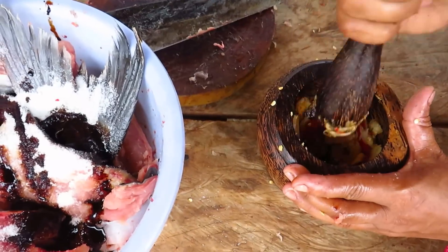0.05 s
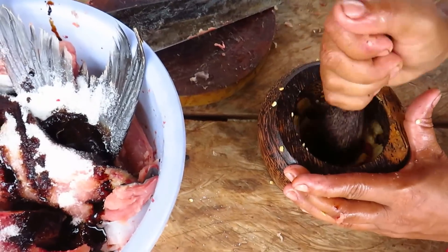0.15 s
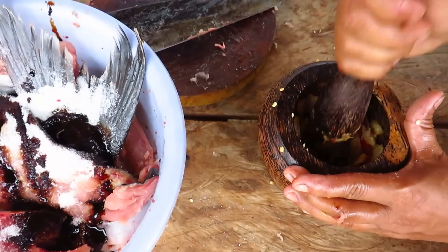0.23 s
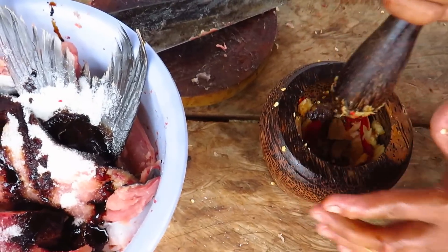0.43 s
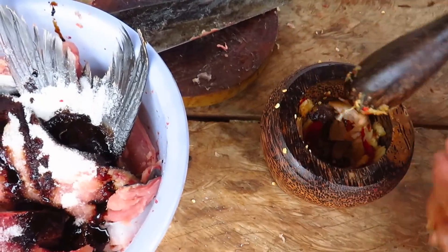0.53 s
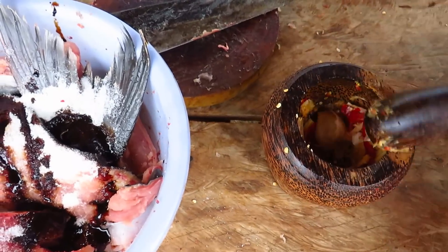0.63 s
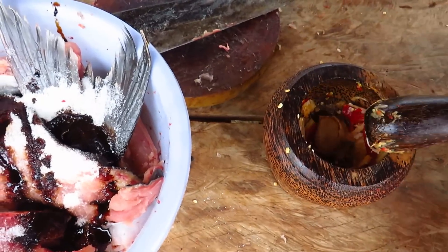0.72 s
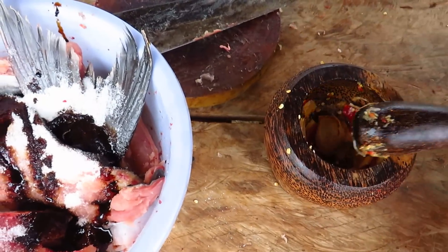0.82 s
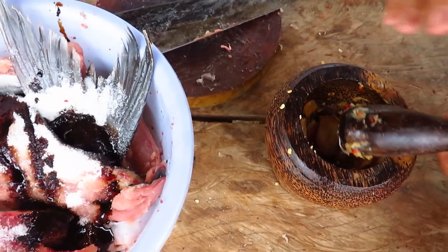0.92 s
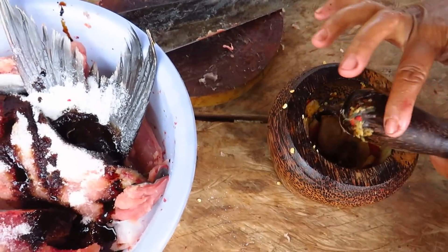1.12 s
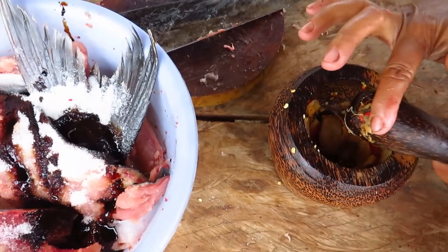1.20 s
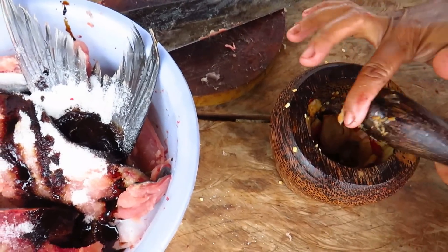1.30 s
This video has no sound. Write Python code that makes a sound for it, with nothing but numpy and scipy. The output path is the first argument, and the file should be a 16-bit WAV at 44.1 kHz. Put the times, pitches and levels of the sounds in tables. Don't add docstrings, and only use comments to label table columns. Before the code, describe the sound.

A wooden pestle pounds a small wooden mortar on planks: a dying thud, one very loud hard knock, then a lighter rim tap, with slight dish rattle and wind buffeting the close stereo microphones outdoors.

```python
import sys
import numpy as np
from scipy import signal
from scipy.io import wavfile

SR = 44100
rng = np.random.default_rng(int(sys.argv[2]) if len(sys.argv) > 2 else 0)


def persist_wave(psi):
    counts = np.round(np.clip(psi, -1, 1) * 32767).astype(np.int16)
    wavfile.write(sys.argv[1], SR, np.atleast_2d(counts).T)


def natural_amplitude(level_db):
    exponent = np.asarray(level_db, float) / 20
    return 10 ** exponent


N = 59535
LEAD_S = 0.05
LONG_N = N + int(LEAD_S * SR)

# start_s, level_db, contact_cutoff_hz, planks_relative_db, second_touch_relative_db
BLOWS = [
    (-.03, -18.5, 703.6, 4.5, 0.5),
    (0.2474, -8.5, 2594, 4.5, 4),
]
# start_s, level_db, contact_cutoff_hz, planks_relative_db
TAPS = [
    (0.7762, -41, 4070, -9.5),
    (0.779, -22, 2542, 3),
    (1.244, -48, 900, 11),
]
# time_s, level_db
BREEZE = [(0.0, -49), (0.13, -51), (0.206, -50), (0.348, -47), (0.6, -60.5), (0.816, -50.5), (0.966, -48),
          (1.35, -49.5)]


def rms_one(x):
    return x / np.sqrt(np.mean(x ** 2) + 1e-20)


def at_hz(points, hz):
    table_hz, value = np.transpose(points)
    return np.interp(np.log(hz), np.log(table_hz), value)


def drift(rate_hz):
    r = np.exp(-80 * np.pi * rate_hz / SR)
    white = rng.standard_normal(N // 40 + 2002)
    slow = rms_one(signal.lfilter([1], [1, -2 * r, r * r], white)[2000:])
    return np.interp(np.arange(N) / 40, np.arange(len(slow)), slow)


def soft(x, hz):
    r = np.exp(-2 * np.pi * hz / SR)
    return signal.lfilter([(1 - r) ** 2], [1, -2 * r, r * r], x + 1e-18)


def butter(x, hz, kind):
    return signal.sosfilt(signal.butter(2, hz, kind, fs=SR, output="sos"), x)


def click(start_s, level_db):
    x = np.zeros(LONG_N)
    x[int((start_s + LEAD_S) * SR)] = natural_amplitude(level_db)
    return x


def dying(start_s, t60_s):
    t = np.arange(LONG_N) / SR - LEAD_S - start_s
    return (t >= 0) * natural_amplitude(-60 * np.maximum(t, 0) / t60_s)


def body(force, modes):
    out = 0
    for hz, level_db, t60_s in modes:
        r = natural_amplitude(-60 / (t60_s * SR))
        w = 2 * np.pi * hz / SR
        ring = signal.lfilter([0, np.sin(w)], [1, -2 * r * np.cos(w), r * r], force + 1e-18)
        out = out + natural_amplitude(level_db) * ring
    return out


def banded_noise(spectrum, low_hz, count, patchy_db, rate_hz):
    # frequency_hz, likeness_0_to_1
    likeness = [(40, 1), (100, 0.39), (200, 0.88), (500, 0.88), (1000, 0.76), (2000, 0.26), (5000, 0.53),
                (12000, 0.11)]
    out, together = 0, drift(rate_hz)
    edges_hz = low_hz * 2 ** (np.arange(count + 1) / 2)
    white = rng.standard_normal((2, 2, N + 4000))
    for k, (low, high) in enumerate(zip(edges_hz, edges_hz[1:])):
        mid, side = butter(white[k % 2], [low, high], "band")[:, -N:]
        hz = np.sqrt(low * high)
        alike = np.clip(at_hz(likeness, hz), 0, 1)
        flicker_db = patchy_db * (together + 0.22 * drift(rate_hz))
        stereo = np.sqrt(1 + alike) * mid + np.sqrt(1 - alike) * side * [[1], [-1]]
        out = out + natural_amplitude(at_hz(spectrum, hz) + flicker_db) * stereo
    return rms_one(out)


def breeze_level_db():
    return np.interp(np.arange(N) / SR, *np.transpose(BREEZE))


def distant_hiss():
    # frequency_hz, level_db_per_hz
    hiss_spectrum = [(300, -5.5), (500, -9), (1000, -13), (2000, -20), (4000, -25.5), (8000, -34.5),
                     (12000, -47.5), (16000, -57.5)]
    breeze_db = breeze_level_db()
    level_db = -62 + 0.11 * (breeze_db - breeze_db.mean())
    return natural_amplitude(level_db) * banded_noise(hiss_spectrum, 300, count=12, patchy_db=0.88, rate_hz=20)


def wind():
    # frequency_hz, level_db_per_hz
    wind_spectrum = [(20, -20.5), (50, -2), (90, -9), (150, -6), (250, -17.5), (450, -36)]
    noise = banded_noise(wind_spectrum, 14, count=9, patchy_db=4.0, rate_hz=75)
    return natural_amplitude(breeze_level_db() + 7.5) * noise


def buffets():
    # start_s, level_db, swing_hz, left_minus_right_db
    gusts = [(0.126, -37.5, 80, 4), (0.187, -45, 62.2, 4), (0.398, -39, 60, 3), (0.557, -37.5, 85, 11),
             (0.621, -33, 77, 8), (0.689, -43, 58.5, 2), (0.517, -41, 46.3, 0), (0.892, -38, 89.94, 15.5),
             (0.914, -31, 74, -8), (0.982, -24.5, 90.9, -2), (1.016, -28.5, 68, -2.5),
             (1.047, -41.5, 59, 1), (1.08, -44, 81.5, 0.5), (1.164, -23.5, 56.1, -6), (1.3172, -30, 86, -8)]
    length_cycles = 1.38
    out, t = np.zeros((2, N)), np.arange(N) / SR
    for start_s, level_db, hz, pan_db in gusts:
        cycles = (t - start_s) * hz - 0.5
        swing = np.exp(-(2 * cycles / length_cycles) ** 2) * np.cos(2 * np.pi * cycles)
        out += natural_amplitude(level_db) * swing * natural_amplitude(pan_db * np.array([[0.5], [-0.5]]))
    return out


def yard_tail():
    # frequency_hz, level_db_per_hz
    yard_spectrum = [(150, -4.5), (300, 5), (700, 1), (1200, -19), (2500, -20.5), (5000, -32),
                     (9000, -50.5)]
    # frequency_hz, t60_s
    yard_t60 = [(200, .3), (700, .2), (2000, 0.11), (6000, 0.023)]
    yard_db, tap_db, rise_s, air_cut_hz = -18.5, -5, 0.018, 5400
    touches = [(s, db, hz, planks_db) for s, db, hz, planks_db, _ in BLOWS]
    touches += [(s, db + tap_db, hz, planks_db) for s, db, hz, planks_db in TAPS]
    noise = rng.standard_normal((2, LONG_N))
    tail, edges_hz = 0, 130 * 2 ** (np.arange(13) / 2)
    for low, high in zip(edges_hz, edges_hz[1:]):
        hz = np.sqrt(low * high)
        strength = 0
        for start_s, level_db, contact_hz, planks_db in touches:
            gain = natural_amplitude(level_db + 0.4 * planks_db) / (1 + (hz / contact_hz) ** 2)
            swell = dying(start_s, at_hz(yard_t60, hz)) - dying(start_s, rise_s)
            strength = strength + gain * swell
        band = butter(strength * noise, [low, high], "band")
        tail = tail + 10 * natural_amplitude(yard_db + at_hz(yard_spectrum, hz)) * band
    return butter(tail, air_cut_hz, "low")[:, -N:]


def table_thuds():
    # start_s, level_db
    thuds = [
        (-.0035, -23),
        (0.032, -32.5),
        (.098, -36.5),
        (.163, -39.5),
    ]
    # frequency_hz, level_db, t60_s
    table_modes = [(178.6, -1, 0.21), (203, -6, 0.29)]
    force = sum(click(start_s, level_db) for start_s, level_db in thuds)
    return body(soft(force, 350.0), table_modes)[-N:]


def dish():
    # start_s, level_db, edge_relative_to_base_db
    rattles = [(.0128, -37.5, 7), (.016, -34, -5.5), (.024, -34.5, -0.5), (.0385, -46, 0), (.051, -37.5, 8),
               (.0595, -32, -9.5), (.085, -48, -6.5), (.1, -50, -7), (.112, -49, -9), (.125, -47.5, -6.5),
               (0.141, -49.5, -0.5), (.165, -54.5, -6), (.19, -53.5, -8.5), (.203, -52, -9.5),
               (.215, -50, -9), (.338, -39, -6), (.37, -42.5, -11), (.395, -50.5, -13), (.465, -55.5, -11)]
    # frequency_hz, level_db, t60_s
    base_modes = [(269.6, -5.5, 0.13), (310, -11.5, .06), (407, -8.5, .05), (520, -10.5, 0.041),
                  (643.7, 0.5, .06), (673, -7, 0.048), (738, -4.5, 0.076), (920, -10, 0.035),
                  (948, -10.5, 0.049)]
    # frequency_hz, level_db, t60_s
    edge_modes = [(1320, -4, 0.022), (1380, -12, 0.11), (1753, -8, .03), (2037, -22, .03),
                  (2680, -21.5, 0.04), (3530, -29.5, 0.19)]
    chatter_db, chatter_t60_s = -23.5, 0.05
    noise = rng.standard_normal(LONG_N)
    base, edge = 0, 0
    for start_s, level_db, edge_db in rattles:
        buzz = natural_amplitude(level_db + chatter_db) * noise * dying(start_s, chatter_t60_s)
        touch = click(start_s, level_db) + buzz
        base = base + touch
        edge = edge + natural_amplitude(edge_db) * touch
    base_ring = body(soft(soft(base, 1500.0), 1800.0), base_modes)
    edge_ring = body(soft(soft(edge, 3200.0), 3600.0), edge_modes)
    return (base_ring + edge_ring)[-N:]


def rim_taps():
    # frequency_hz, level_db, t60_s
    rim_modes = [(438, -5, 0.066), (756, 3.5, 0.032), (930, 5.5, 0.047), (1106, -25, 0.074),
                 (1640, -19.5, .02), (2370, -13.5, .014), (2900, -17, 0.0074), (3180, -22.5, 0.012),
                 (3760, -36, 0.025)]
    # frequency_hz, level_db, t60_s
    under_modes = [(148, -20.5, 0.093), (214, -3, 0.21), (273.5, 5.5, 0.035), (541, -6, 0.059),
                   (622.4, -13.5, 0.13)]
    under_lag_s = 0.00059
    out = 0
    for start_s, level_db, contact_hz, planks_db in TAPS:
        force = soft(click(start_s, level_db), contact_hz)
        late = np.roll(force, int(under_lag_s * SR))
        out = out + body(force, rim_modes) - natural_amplitude(planks_db) * body(late, under_modes)
    return out


def pestle_blows():
    # frequency_hz, level_db, t60_s
    mortar_modes = [(758.5, -4.5, .033), (924.5, -1.5, .034), (968, 2.5, .032), (1290, -1, 0.0069),
                    (1586, -20, .04), (1810, -21.5, .02), (2087, -13, 0.019), (2736, -8, 0.018),
                    (3284, -8.5, .016), (3420, -17, 0.022), (4500, -21.5, 0.035), (6483, -23, .012),
                    (8310, -30, .01)]
    # frequency_hz, level_db, t60_s
    wall_modes = [(537.7, -6.5, 0.15), (628.3, -20, 0.17), (692, -28, .3)]
    # frequency_hz, level_db, t60_s
    plank_modes = [(209, -18.5, 0.17), (291, -3.5, 0.019), (358, -24, .06), (444, -17.5, .06)]
    rebound_s = 0.001
    grit_db, grit_t60_s, grit_hz = -33.5, 0.11, 900
    crack_db, crack_t60_s, crack_cutoff_ratio = -21, 0.014, 0.7
    crack_noise, grit_noise = rng.standard_normal((2, LONG_N))
    crack_noise = np.diff(crack_noise, prepend=0)
    out = 0
    for start_s, level_db, contact_hz, planks_db, second_db in BLOWS:
        grit = 2 * natural_amplitude(level_db + grit_db) * soft(grit_noise * dying(start_s, grit_t60_s), grit_hz)
        second = click(start_s + rebound_s, level_db + second_db) + grit
        touches = np.array([click(start_s, level_db), second])
        first, push = soft(soft(touches, contact_hz), 2 * contact_hz)
        crack = soft(crack_noise * dying(start_s, crack_t60_s), crack_cutoff_ratio * contact_hz)
        crack = 10 * natural_amplitude(level_db + second_db + crack_db) * soft(crack, 8200.0)
        out = out + body(first + push, mortar_modes) + crack
        out = out - body(push, wall_modes) - natural_amplitude(planks_db) * body(push, plank_modes)
    return out


def knocks():
    return butter(pestle_blows() + rim_taps(), 149.57, "high")[-N:]


def scene():
    pan_db, side_lag_s, side_db, port_lag, yard_side_db = 1.5, 0.0003, -39.5, 0.65, -15.5
    near = knocks() + dish() + table_thuds()
    tail = yard_tail()
    tail, spread = tail[0], tail[1]
    late = np.interp(np.arange(N) - side_lag_s * SR, np.arange(N), near)
    side = natural_amplitude(side_db) * late + port_lag * np.gradient(near) + natural_amplitude(yard_side_db) * spread
    centre = (near + tail) * natural_amplitude(pan_db * np.array([[0.5], [-0.5]]))
    return centre + side * [[1], [-1]] + wind() + buffets() + distant_hiss()


def low_pass(x):
    return signal.sosfilt(signal.butter(12, 14800, fs=SR, output="sos"), x)


def record(dry):
    duck_from_db, duck_share, back_db_per_s, attack_hz = -18.5, 0.35, 23, 20
    clip_top, clip_knee = 1.03, 6.0
    recovery_db = back_db_per_s * np.arange(N) / SR
    peak_db = 20 * np.log10(np.abs(dry).max(axis=0) + 1e-9)
    held_db = np.maximum.accumulate(peak_db + recovery_db) - recovery_db
    x = dry * natural_amplitude(-duck_share * soft(np.maximum(held_db - duck_from_db, 0), attack_hz))
    x = x / (1 + np.abs(x / clip_top) ** clip_knee) ** (1 / clip_knee)
    return low_pass(x)


dry = scene()
out = record(dry)
persist_wave(out)
```